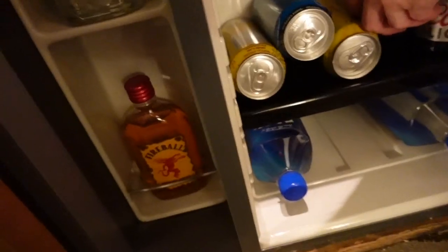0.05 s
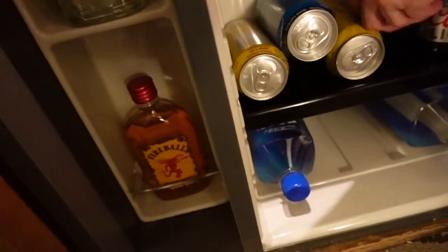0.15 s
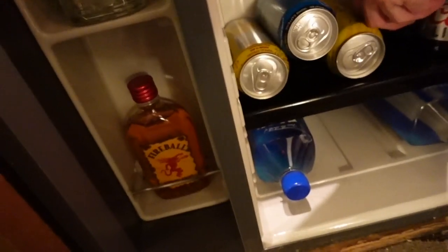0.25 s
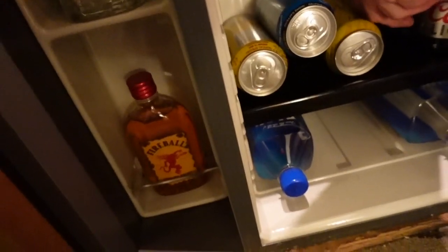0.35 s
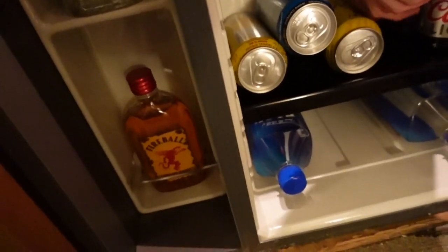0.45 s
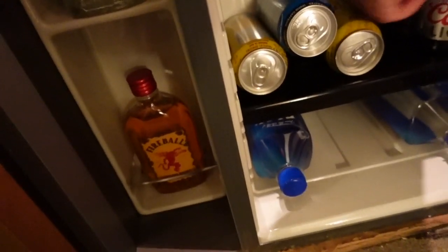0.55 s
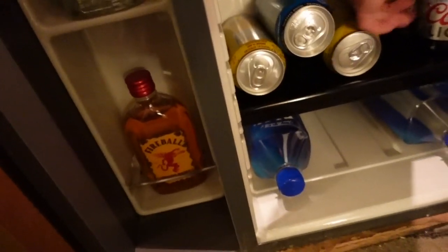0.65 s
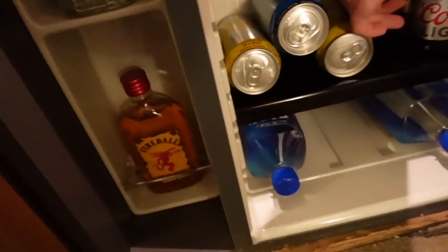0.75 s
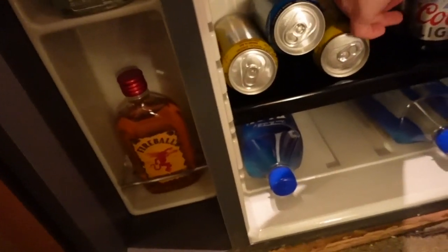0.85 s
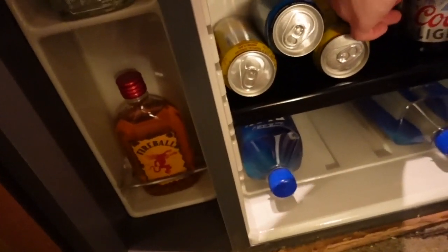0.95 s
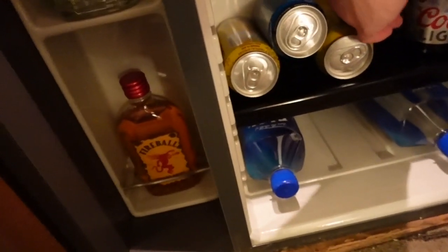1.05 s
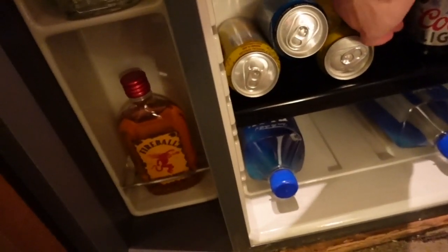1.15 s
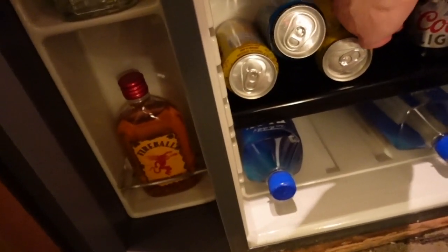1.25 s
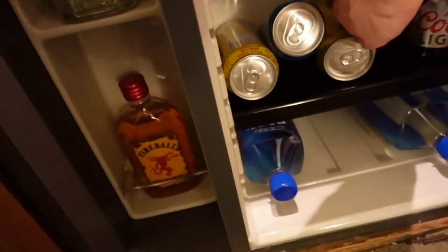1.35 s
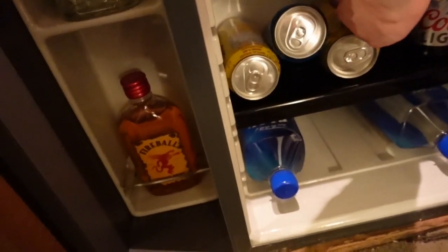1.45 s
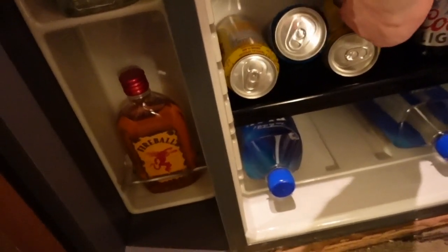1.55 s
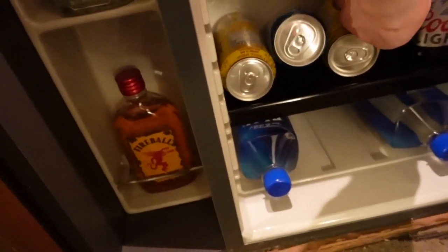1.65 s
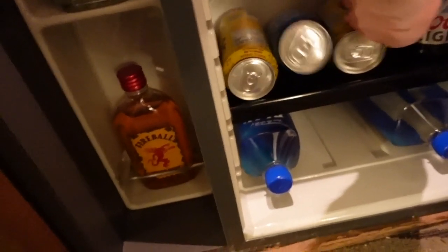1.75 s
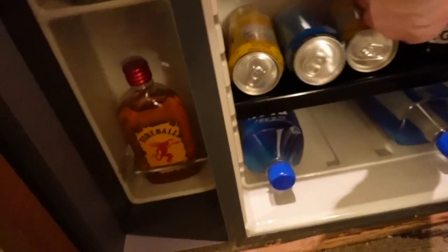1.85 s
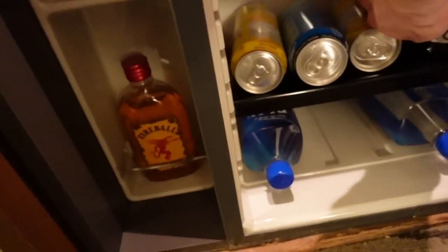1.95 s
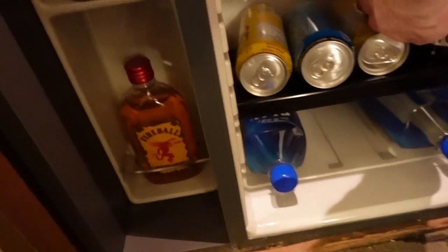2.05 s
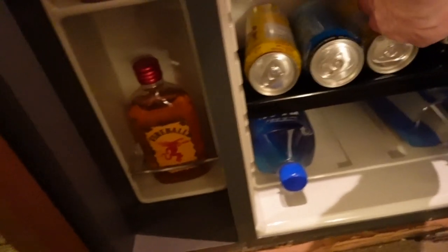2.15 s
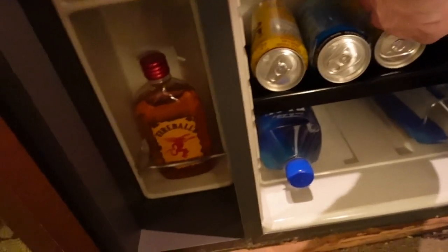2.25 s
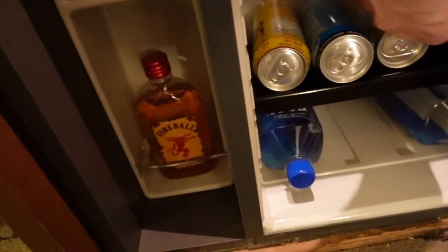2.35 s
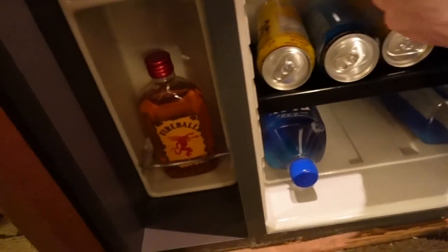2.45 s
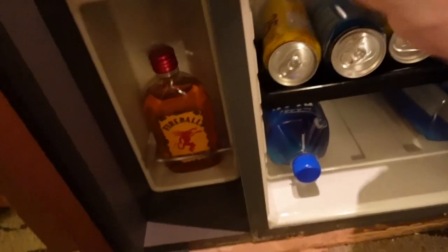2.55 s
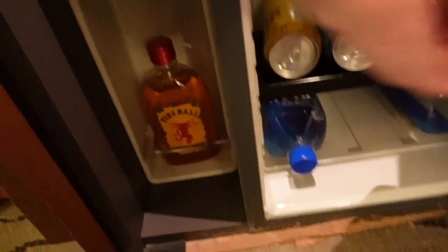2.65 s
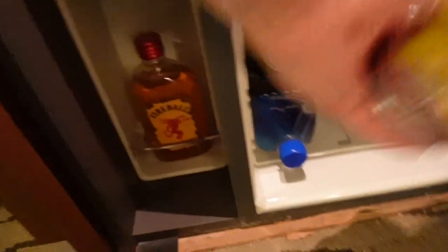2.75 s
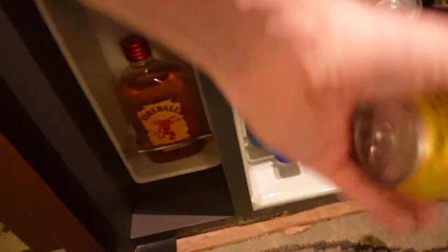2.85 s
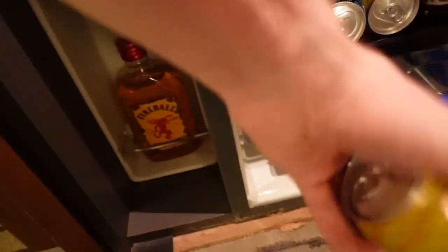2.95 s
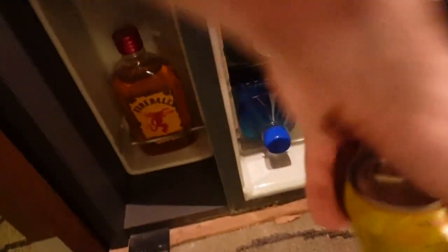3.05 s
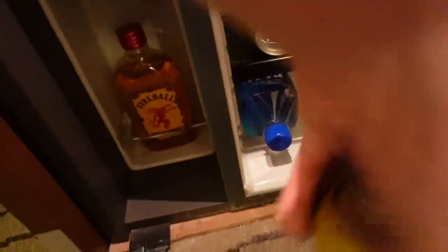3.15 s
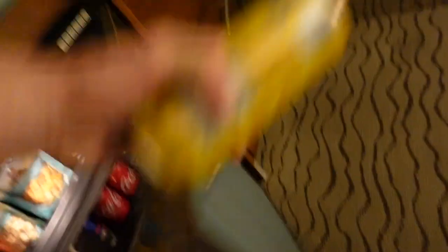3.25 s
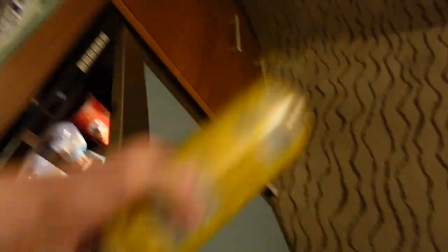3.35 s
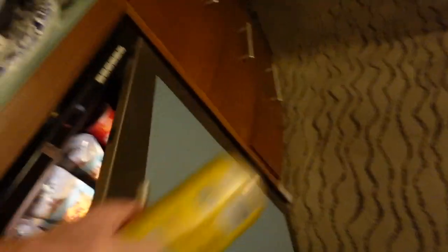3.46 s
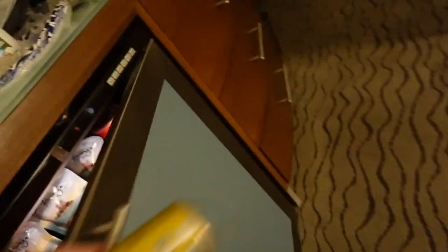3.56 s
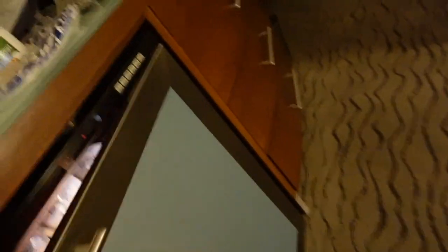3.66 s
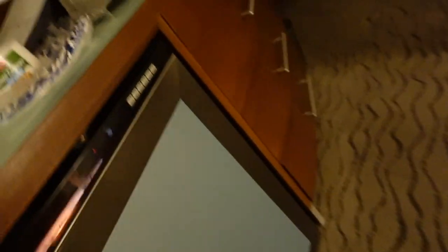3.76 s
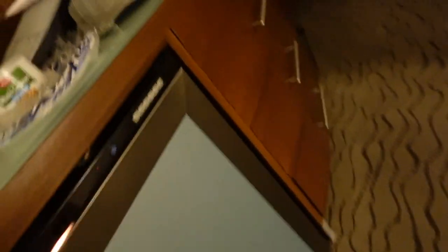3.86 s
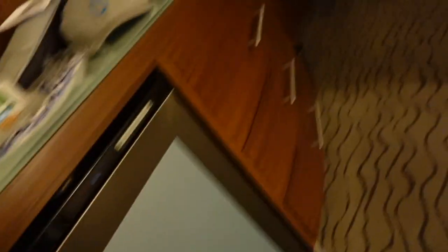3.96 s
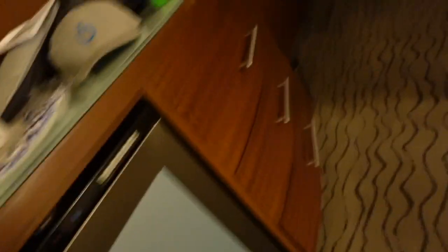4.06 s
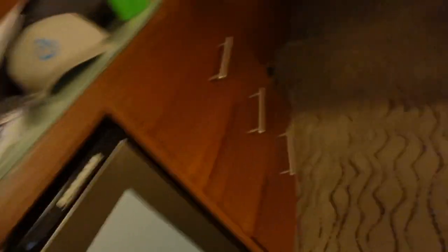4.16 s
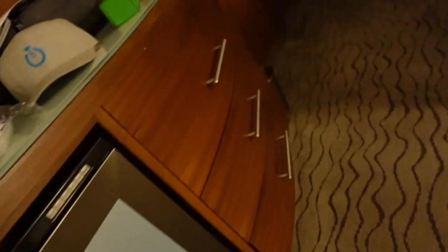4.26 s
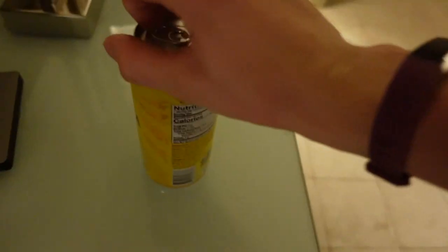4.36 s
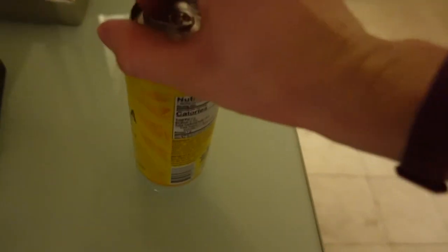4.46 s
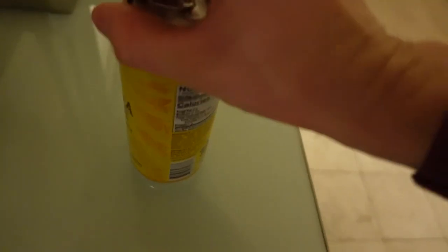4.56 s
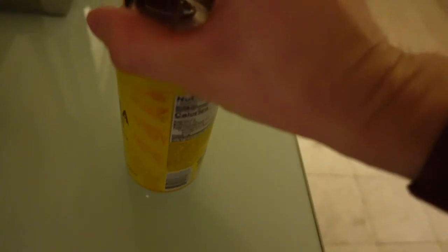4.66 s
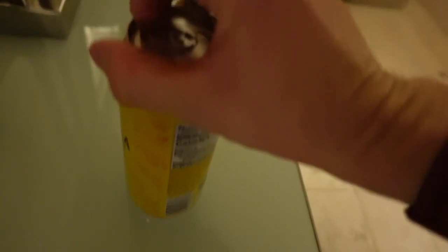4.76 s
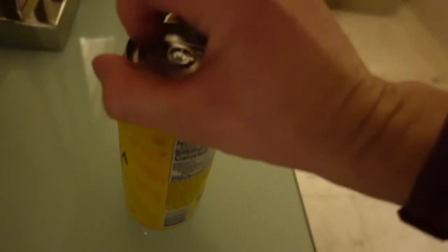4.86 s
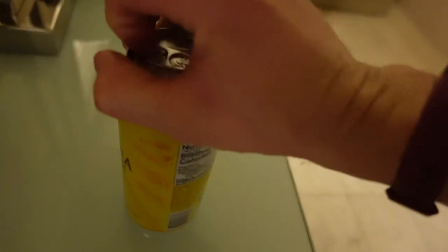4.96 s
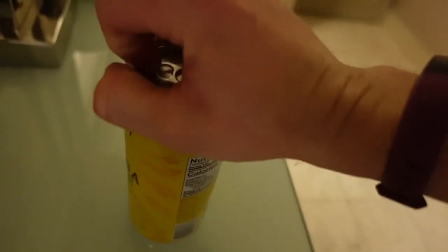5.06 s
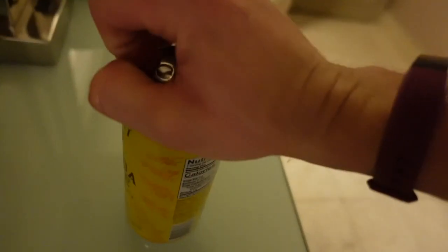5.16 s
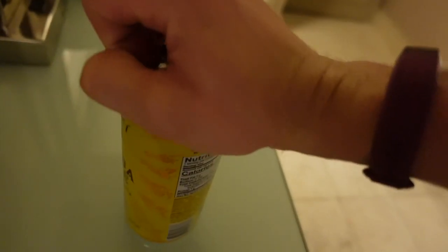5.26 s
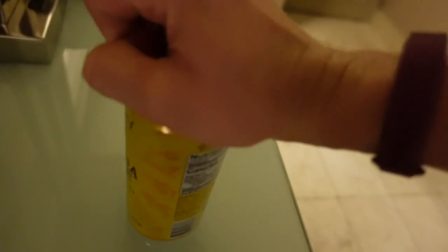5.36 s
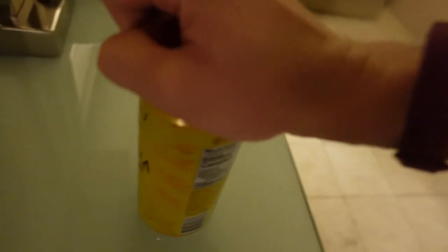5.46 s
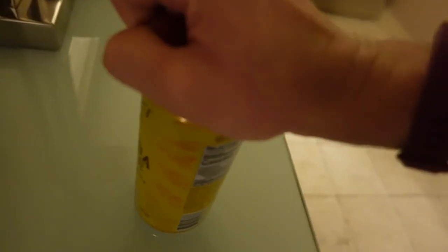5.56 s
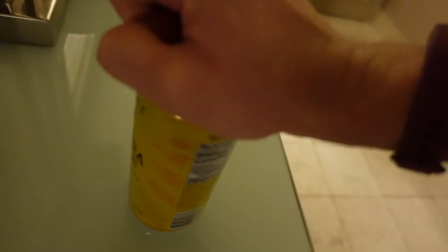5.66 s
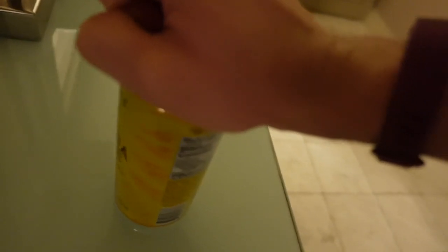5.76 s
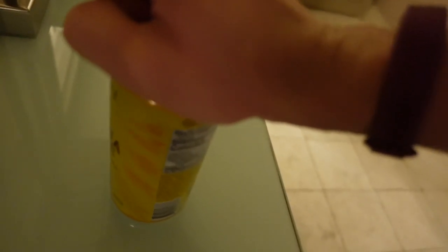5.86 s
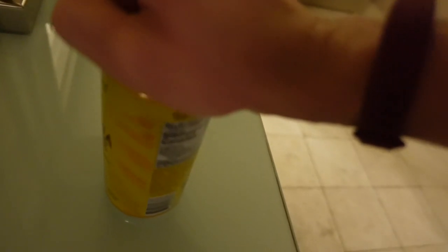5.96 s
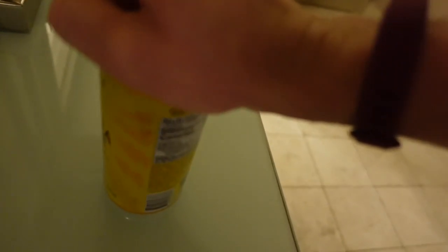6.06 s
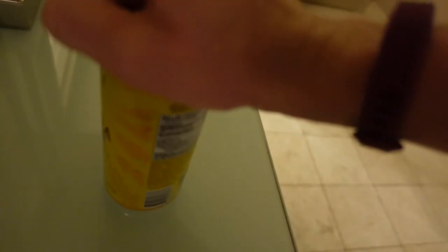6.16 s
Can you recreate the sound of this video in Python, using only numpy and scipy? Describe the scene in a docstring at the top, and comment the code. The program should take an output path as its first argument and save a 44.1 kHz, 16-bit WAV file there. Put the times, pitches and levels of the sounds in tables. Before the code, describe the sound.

Close to an open, humming fridge in a small quiet room, fingers tap and slide over drink cans, which bump dully against the wall. Cans roll, drop and clash on the rack. One is scraped out over the edge, its thin wall popping in the grip, and the door is pushed shut. After faint ticks at the tab, the lid cracks open in four quick steps, each with a hiss of gas.

```python
"""A small quiet room, a stereo microphone close to an open, humming fridge. Fingers tap and slide over
drink cans, which bump dully against the cabinet; then cans roll, drop and clash on the rack. One is
dragged out over the rack's edge and its wall pops under the grip. The fridge door is pushed shut.
Last, close up at a counter, a fingertip works under the tab and the lid cracks in four steps,
each letting out a hiss of gas."""
import sys
import numpy as np
from scipy import signal
from scipy.fft import rfft, irfft, next_fast_len
from scipy.io import wavfile

SR = 44100
rng = np.random.default_rng(int(sys.argv[2]) if len(sys.argv) > 2 else 0)


def transcribe(signal):
    """Save signal, clipped to [-1, 1], as a 16-bit WAV file at the path in sys.argv[1]."""
    frames = np.atleast_2d(signal).T
    limited = np.clip(frames, -1, 1)
    pcm = np.round(limited * 32767).astype(np.int16)
    wavfile.write(sys.argv[1], SR, pcm)


N = 273506


def amp(db):
    """Decibels to gain."""
    return 10 ** (np.asarray(db) / 20)


def add(mix, start_s, sound):
    """Mixes a sound in at start_s."""
    part = mix[:, max(round(start_s * SR), 0):][:, :sound.shape[-1]]
    part += sound[..., :part.shape[1]]


def curve(points, hz):
    """Gain at hz of a spectrum given as rows of freq_hz, gain_db."""
    f, db = np.transpose(points)
    return amp(np.interp(np.log(hz + 1), np.log(f + 1), db))


def peak(f, hz, width):
    """Gain of a resonance with steep skirts."""
    return 1 / (1 + .5 * ((f - hz) / width) ** 2) ** 2


def rings(f, table):
    """Gain of resonances given as rows of pitch_hz, width_hz, gain_db."""
    return sum(amp(db) * peak(f, hz, width) for hz, width, db in table)


def lumps(step_hz, depth_db):
    """A random uneven spectrum: each contact or gap favours its own resonances."""
    grid = np.arange(0, SR / 2, step_hz)
    heights = np.clip(rng.standard_normal(1000)[:len(grid)], -2, 2)
    return lambda f: amp(depth_db * np.interp(f / (1 + f / 12000), grid, heights))


def flutter(size, per_s, depth_db):
    """A gain that wanders at random, per_s times a second."""
    knots = rng.standard_normal(size // 8)
    return amp(depth_db * np.interp(np.arange(size) * per_s / SR, np.arange(len(knots)), knots))


def swell(t, rise, t60):
    """Builds up to 1, then dies away."""
    shape = (1 - np.exp(-t / max(rise, 1e-5))) * amp(-60 * t / t60)
    return shape / shape.max()


# stereo width at the microphone's two close capsules: freq_hz, side_to_mid_db
STEREO_WIDTH = [(100, -36), (300, -28), (700, -20), (1500, -15.5), (3000, -12.5), (5500, -9), (11000, -13)]

def noise(size, shape, grain=1, spread_db=0):
    """Stereo noise of spectrum shape(f), rms 1; grain scales the excitation, spread_db widens it."""
    length = next_fast_len(size)
    f = np.fft.rfftfreq(length, 1 / SR)
    mid, side = rfft(rng.standard_normal((2, size)) * grain, length) * shape(f)
    side = side * np.minimum(curve(STEREO_WIDTH, f) * amp(spread_db), 1)
    pair = irfft([mid + side, mid - side], length)[:, :size]
    return pair / np.sqrt(np.mean(pair ** 2) + 1e-20)


# air moving all round the microphone: freq_hz, gain_db
ROOM_AIR = [(18, -62.5), (30, -32.5), (106, -5.5), (171, -7), (204, 0.5), (238, -12), (533, -17),
            (575, -8.5), (620, -10.5), (1460, -25.5), (2140, -21), (2420, -23.5), (4550, -30.5),
            (11600, -37.5), (12500, -60), (16200, -89), (22000, -120)]
# fridge and ventilation: start_s, end_s, pitch_hz, width_hz, level_db
ROOM_HUMS = [(0, 3.32, 126, 17, -54), (0, 3.32, 813, 37, -65.5), (0, 3.32, 1630, 280, -64),
             (3.32, 4.45, 2030, 360, -65), (4.45, 6.2, 203, 16, -62.5), (4.448, 4.7, 634, 61, -73)]

def room_tone(air_db=-59, spread_db=7):
    """Moving air, and hums that switch abruptly at two cuts."""
    t = np.arange(N) / SR
    out = amp(air_db) * noise(N, lambda f: curve(ROOM_AIR, f), spread_db=spread_db)
    for start, end, hz, width, db in ROOM_HUMS:
        gate = np.clip(np.minimum(t - start, end - t) / 0.015 + 1, 0, 1)
        out += amp(db) * gate * noise(N, lambda f: peak(f, hz, width), spread_db=spread_db)
    return out


# fingers and rims, close up: start_s, peak_db, pitch_hz
FINGER_TAPS = [(.111, -31.5, 7040), (.318, -38.5, 4400), (.603, -30, 5270), (.793, -38, 6100),
               (.85, -37, 1590), (1.019, -26.5, 7600), (2.03, -18.5, 1050), (2.220, -24, 6440),
               (2.338, -33.5, 3930), (2.421, -34, 3880), (2.891, -23.5, 4630), (2.957, -20, 7400),
               (3.029, -31.5, 4230), (3.087, -25.5, 2430), (3.147, -25, 3190), (3.244, -36, 4170),
               (3.281, -41, 5000), (3.35, -37.5, 6350), (3.693, -40.5, 3900), (3.765, -45.5, 3010),
               (4.078, -38, 6100), (4.216, -35.5, 422), (5.000, -46.5, 624), (5.435, -47, 625)]
# a tap's click: freq_hz, gain_db
TAP_CLICK = [(200, -19), (1000, 1.5), (2500, 5), (5000, 5.5), (8000, 1), (12000, -10.5)]

def taps(t60=0.064, even_hz=3730, click_db_per_octave=8.5):
    """A short ring and a broad click; harder taps ring higher, and above even_hz the click leads."""
    t, out = np.arange(SR // 4) / SR, np.zeros((2, N))
    for start, db, hz in FINGER_TAPS:
        ring = noise(len(t), lambda f: peak(f, hz, 0.079 * hz)) * swell(t, 0.00055, t60)
        favoured = lumps(step_hz=150, depth_db=5)
        click = noise(len(t), lambda f: curve(TAP_CLICK, f) * favoured(f))
        click *= swell(t, 0.00013, 0.8 * t60)
        tap = ring + amp(click_db_per_octave * np.log2(hz / even_hz)) * click
        add(out, start, amp(db) * tap / abs(tap).max())
    return out


def strokes(table, arch_power=0.64):
    """Gain of a set of strokes, each speeding up and slowing down in an arch."""
    t = np.arange(N) / SR
    return sum(amp(db) * abs(np.sin(np.pi * np.clip((t - start) / length, 0, 1))) ** arch_power
               for start, length, db in table)


def until_cut(cut_s=3.325, fade_s=0.014):
    """1 until the first cut, then 0."""
    return np.clip((cut_s - np.arange(N) / SR) / fade_s, 0, 1)


# skin and metal passing over the cans: start_s, length_s, level_db
SLIDE_STROKES = [(.33, 0.15, -66), (.68, 0.15, -58.5), (.85, 0.16, -49), (1.3, 0.26, -50), (1.55, .29, -53),
                 (1.685, 0.04, -41), (1.87, 0.15, -37), (2.03, 0.22, -46), (2.5, .17, -60),
                 (2.68, 0.64, -52.5), (2.97, 0.18, -52)]
# their friction hiss: freq_hz, gain_db
SLIDE_HISS = [(530, -31), (900, -25), (1210, -6), (1340, -23.5), (1530, -3), (2550, -7.5), (2870, -5.5),
              (4830, -7.5), (5380, -7.5), (12000, -25.5), (15600, -60), (22000, -120)]
# the held can singing under the skin: pitch_hz, width_hz, gain_db
HELD_CAN_RINGS = [(1232, 120, -2), (1570, 64, 2), (1970, 110, -5), (2290, 119, -8.5), (3140, 150, 0.5),
                  (3910, 263, -4.5), (4680, 140, -6)]

def sliding(grip_db=-61.5, hiss_db=-1, ring_db=-2, skin_db=-5, lifted_s=2.7):
    """Skin and metal slip in tiny catches; fingers brush the cans until one is lifted and rings."""
    catches = flutter(N, per_s=780, depth_db=0.5) * flutter(N, per_s=39, depth_db=1.3)
    free = np.clip((np.arange(N) / SR - lifted_s) / 0.037, .3, 1)
    hiss = amp(hiss_db) * noise(N, lambda f: curve(SLIDE_HISS, f), catches)
    skin = amp(skin_db) * (1 - free) * noise(N, lambda f: peak(f, 8000, 4000), catches)
    singing = amp(ring_db) * free * noise(N, lambda f: rings(f, HELD_CAN_RINGS), catches)
    return (amp(grip_db) + strokes(SLIDE_STROKES)) * until_cut() * (hiss + skin + singing)


def blow(bands, modes, uneven_db, db, bass_db, treble_db, rise, t60_factor, build_cycles=1.4):
    """A struck body: crowded modes band by band and a few clear ones; the bass builds up last."""
    t, out = np.arange(SR) / SR, np.zeros((2, SR))
    tone = [(200, bass_db), (600, 0), (1300, 0), (3500, treble_db)]
    centres = np.log([band[0] for band in bands])
    favoured = lumps(step_hz=60, depth_db=uneven_db)
    for own, (hz, band_db, t60) in zip(np.eye(len(bands)), bands):
        crowd = noise(SR, lambda f: np.interp(np.log(f + 1), centres, own) * f / (f + 40) * favoured(f))
        envelope = swell(t, rise + build_cycles / hz, t60 * t60_factor)
        out += amp(band_db) * curve(tone, hz) * crowd * envelope
    for hz, mode_db, t60 in modes:
        detuned_hz = hz * (1 + .008 * rng.standard_normal())
        mode = np.sqrt(2) * np.sin(2 * np.pi * (detuned_hz * t + rng.random()))
        envelope = swell(t, rise + build_cycles / hz, t60 * t60_factor)
        out += amp(mode_db) * curve(tone, hz) * mode * envelope
    return amp(db) * out


# dense rattle of cans, rack and fridge walls: band_hz, gain_db, base_t60_s
FRIDGE_RATTLE = [(62, -31, 0.404), (106, -18, .35), (159, -6, 0.43), (352, -2, 0.4), (837, -3, 0.41),
                 (1643, -5, 0.44), (2670, -0.5, 0.27), (5280, -5.5, 0.2), (9500, -11, 0.085)]
# full cans against the fridge's inside wall: start_s, boom_db, pitch_hz, contact_db
WALL_BUMPS = [(.613, -33.5, 160, -47), (.685, -23.5, 163, -43.5), (.850, -22, 180, -45.5),
              (1.001, -31, 187, -53), (1.105, -33.5, 151, -60.5)]

def bumps(rock_s=.0195, rock_share=0.62):
    """A soft push booms in the cabinet for two or three cycles and rocks back a few times."""
    t, out = np.arange(SR // 4) / SR, np.zeros((2, N))
    for start, db, hz, contact_db in WALL_BUMPS:
        boom = np.sin(2 * np.pi * hz * t) * np.exp(-((t - .011) / 0.0059) ** 2)
        for k in range(6):
            add(out, start + k * rock_s, np.sqrt(2) * amp(db) * rock_share ** k * boom)
        contact = blow(FRIDGE_RATTLE, [], uneven_db=6, db=contact_db, bass_db=0, treble_db=-10,
                       rise=0.00031, t60_factor=0.95)
        add(out, start, contact)
    return out


# shoves that set cans rolling: top_speed_s, level_db, run_up_s, coast_t60_s
ROLL_SHOVES = [(1.39, -51, .17, 1.2), (1.66, -44.5, 0.19, 1.26), (2.2, -35, 0.33, 2.04),
               (2.58, -41, 0.15, 1.48), (2.92, -45.5, 0.24, 1.37), (3.265, -44.5, 0.063, .6)]
# rims running over the rack: freq_hz, gain_db
ROLL_RUMBLE = [(47, -47), (80, -18.5), (107, -16), (201, 1), (346, -2.5), (445, -7.5), (699, -5),
               (933, -9.5), (2100, -20.5), (2860, -16.5), (6000, -33.5), (7800, -64.5), (13200, -120)]
# the rack ringing under them: pitch_hz, width_hz, gain_db
RACK_RINGS = [(200, 23, 2.5), (479, 34, 2), (568, 19, 1), (817, 28.6, -7), (930, 22, -3), (1060, 45, -8),
              (1243, 20, -5.5)]

def rolling(rumble_db=-3, ring_db=-2, run_up_db=15.5):
    """Shoved cans gather speed and coast; rims rumble over the rack in jolts and keep it ringing."""
    t = np.arange(N) / SR
    shoves_db = [db - run_up_db * np.maximum(top - t, 0) / run_up - 60 * np.maximum(t - top, 0) / t60
                 for top, db, run_up, t60 in ROLL_SHOVES]
    speed = amp(np.max(shoves_db, axis=0))
    jolts = flutter(N, per_s=140, depth_db=3)
    rumble = noise(N, lambda f: curve(ROLL_RUMBLE, f), jolts)
    ringing = noise(N, lambda f: rings(f, RACK_RINGS), jolts)
    return speed * until_cut() * (amp(rumble_db) * rumble + amp(ring_db) * ringing)


# cans landing on the rack: start_s, level_db, bass_db, treble_db, t60_factor
RACK_KNOCKS = [(1.406, -25.5, -7.5, 7, 0.92), (1.426, -27.5, 1.5, -4, 0.93), (1.704, -37.5, -4, 3.5, 0.55),
               (1.816, -25, -6.5, -3.5, 0.93), (1.882, -24.5, 3, 3.5, 0.81), (1.946, -22, -2.5, 3, 0.41),
               (1.985, -31, -4, -0.5, 1.1), (2.028, -23.5, -8, -7.5, 0.56), (2.086, -24, -17.5, 2, 0.96),
               (2.130, -30, -14, -16, 1.3), (2.215, -36, -14, -6.5, 0.83), (2.337, -36, -13, -12.5, 0.76),
               (2.420, -40.5, 2, -13, .6)]
# clear modes of the loaded rack: pitch_hz, gain_db, base_t60_s
RACK_MODES = [(137.1, -9, 0.59), (217.5, -2, 0.28), (368, -10, 0.068), (423.2, -4, 0.31), (578, -5.5, 0.33),
              (864, -14.5, 0.36), (981, -13.5, 0.4), (1070, -11.5, 0.24), (1190, -11.5, 0.46),
              (1868, -15, 0.36), (2640, -13.5, 0.32), (4186, -16.5, 0.26)]

def knocks(uneven_db=5.5):
    """Cans strike the rack and shake the fridge; softer knocks press in more slowly."""
    out = np.zeros((2, N))
    for start, db, bass_db, treble_db, t60_factor in RACK_KNOCKS:
        rise = .0008 * 2 ** ((-24 - db) / 15)  # doubles for every 15 dB softer
        knock = blow(FRIDGE_RATTLE, RACK_MODES, uneven_db, db, bass_db, treble_db, rise, t60_factor)
        add(out, start, knock)
    return out


def ring_out(start_s, modes, rise_s):
    """One clear metallic ring, soon damped by the drink."""
    t, out = np.arange(SR // 2) / SR, np.zeros((2, N))
    for hz, db, t60 in modes:
        add(out, start_s, amp(db) * np.sin(2 * np.pi * hz * t) * swell(t, rise_s, t60))
    return out


# body of a fallen can: pitch_hz, level_db, t60_s
DROP_MODES = [(376.5, -21.5, .15), (579, -30.5, 0.28), (987, -29.5, 0.27), (1165, -29.5, 0.42)]

def can_drop():
    """The first can lands on its side and rings hollow."""
    return ring_out(start_s=1.424, modes=DROP_MODES, rise_s=0.0056)


# struck rims: pitch_hz, level_db, t60_s
RIM_MODES = [(2920, -13, 0.025), (2530, -28.5, 0.44), (3250, -26.5, .03), (5900, -27, 0.032)]

def rim_clash():
    """Two rims clash as the cans settle."""
    return ring_out(start_s=1.9465, modes=RIM_MODES, rise_s=0.0018)


# the can dragged out over the rack's edge: start_s, length_s, level_db
EDGE_SCRAPES = [(2.529, 0.076, -47.5), (2.701, 0.045, -48.5), (2.745, 0.078, -44), (2.984, 0.053, -48),
                (3.237, 0.079, -57)]
# its thin wall, sounded by the edge: pitch_hz, width_hz, gain_db
THIN_WALL_RINGS = [(1187, 30, 0), (1556, 35, -2), (3275, 48, -5), (3570, 65, -4), (4750, 43, -2)]

def scrapes(rasp_db=-2):
    """Quick stick and slip rasps and sets the can singing."""
    t, out = np.arange(SR // 4) / SR, np.zeros((2, N))
    for start, length, db in EDGE_SCRAPES:
        slips = flutter(len(t), per_s=730, depth_db=3)
        stroke = np.sqrt(np.maximum(np.sin(np.pi * np.minimum(t / length, 1)), 0))
        singing = noise(len(t), lambda f: rings(f, THIN_WALL_RINGS), slips)
        rasp = amp(rasp_db) * noise(len(t), lambda f: curve(SLIDE_HISS, f), slips)
        add(out, start, amp(db) * stroke * (singing + rasp))
    return out


# the flexing can, close up in the hand: pitch_hz, level_db, t60_s
POP_MODES = [(738, -20, 0.052), (812, -23.5, 0.037), (1936, -33, 0.05), (6000, -40, .05)]

def wall_pop():
    """The can's wall springs back under the grip."""
    return ring_out(start_s=2.956, modes=POP_MODES, rise_s=0.0042)


# door meeting frame: start_s, level_db, bass_db, treble_db, rise_s, t60_factor
DOOR_CONTACTS = [(3.9215, -30, -14, -8, 0.0008, 0.18), (3.933, -28, -6.5, 2.5, 0.0011, 0.27),
                 (3.941, -37.5, 3, 0, 0.0012, 1.63)]
# the door's crowded modes: band_hz, gain_db, base_t60_s
DOOR_BANDS = [(60, -20, 0.42), (123, 3, 0.29), (247, -2.5, 0.38), (550, 0, 0.35), (800, -2.5, 0.34),
              (1170, -7.5, 0.46), (1890, 1.5, 0.28), (4320, -7, 0.41), (8700, -19.5, 0.4)]

def fridge_door(uneven_db=2):
    """Pushed shut, the door strikes its frame in three quick blows."""
    out = np.zeros((2, N))
    for start, *contact in DOOR_CONTACTS:
        add(out, start, blow(DOOR_BANDS, [], uneven_db, *contact))
    return out


# a fingertip under the tab, close up at the counter: start_s, length_s, level_db
FINGERTIP_RUBS = [(4.55, 0.19, -61.5), (4.75, 0.49, -71.5), (5.19, 0.26, -64.5)]
# the nail catching the tab: start_s, peak_db
NAIL_TICKS = [(4.588, -36.5), (4.651, -37.5), (4.895, -49.5), (5.218, -48)]
# the tab's ring: pitch_hz, width_hz, gain_db
TAB_RINGS = [(2210, 95, 0), (3400, 130, -4), (4960, 80, 2), (6680, 120, -8), (5000, 3600, -12)]

def tab_rub(tick_t60=0.051):
    """A fingertip works under the tab and faintly sounds the lid; now and then the nail catches."""
    # pitch_hz, width_hz, gain_db
    lid = [(1890, 164, 4), (3550, 274, -6.5), (4730, 200, 1), (5960, 820, -5.5)]
    catches = flutter(N, per_s=340, depth_db=4)
    out = strokes(FINGERTIP_RUBS) * noise(N, lambda f: rings(f, lid), catches)
    t = np.arange(SR // 4) / SR
    for start, db in NAIL_TICKS:
        tick = noise(len(t), lambda f: rings(f, TAB_RINGS)) * swell(t, 0.00035, tick_t60)
        add(out, start, amp(db) * tick / abs(tick).max())
    return out


# the lid's ping: pitch_ratio, gain_db, t60_s
LID_MODES = [(.41, -16.5, 0.029), (.64, -12.5, 0.0088), (.86, 1, 0.013), (1.0, 6, 0.011),
             (1.09, 2.5, 0.013), (1.24, -2.5, 0.0097), (1.5, -2.5, .006), (1.751, -13, 0.0086),
             (2.1, -27, 0.0042)]
# the gas jet, also the colour of the lid's snap: freq_hz, gain_db
JET_SPECTRUM = [(60, -42), (180, -23), (400, -33), (1000, -10.5), (2000, 0.5), (3000, -1.5), (3900, 0.5),
                (5000, 7), (6300, 4), (7100, 5), (8300, -3), (9400, -3), (10500, -8.5), (12000, -15.5)]

def lid_crack(t, pitch_hz, snap_db, snap_t60=0.011):
    """The tearing lid pings over a snap of noise; peak 1."""
    ping = sum(amp(db - 60 * t / t60) * np.sin(2 * np.pi * (ratio * pitch_hz * t + rng.random()))
               for ratio, db, t60 in LID_MODES)
    snap = noise(len(t), lambda f: curve(JET_SPECTRUM, f)) * amp(snap_db - 60 * t / snap_t60)
    low_cut = signal.butter(3, 900, "high", fs=SR)  # the crack carries no bass
    crack = signal.lfilter(*low_cut, ping + snap)
    crack = np.tanh(1.5 * crack / abs(crack).max())  # the biggest swings round off
    return crack / abs(crack).max()


def gas_hiss(size, jet_db, tilt_db, head_hz, head_db, slot_hz, slot_db, gurgle_db):
    """A sputtering jet, tilted above 4 kHz, sounds the head space and the slot over a low gurgle."""
    sputter = flutter(size, per_s=530, depth_db=1)
    edge = lumps(step_hz=90, depth_db=3.8)
    tilt = lambda f: amp(tilt_db * np.log2(np.maximum(f, 4000) / 4000))
    hiss = amp(jet_db) * noise(size, lambda f: curve(JET_SPECTRUM, f) * edge(f) * tilt(f), sputter)
    head, slot = [(head_hz, 200, 0)], [(slot_hz, 400, 0)]  # pitch_hz, width_hz, gain_db
    gurgle = [(316, 190, -17), (875, 143, 5)]
    for db, cavity in (head_db, head), (slot_db, slot), (gurgle_db, gurgle):
        hiss += amp(db) * noise(size, lambda f: rings(f, cavity), sputter)
    return hiss


# the lid giving way, close up: start_s, peak_db, pitch_hz, gas_rise_s, gas_hold_s, gas_t60_s
LID_TEARS = [(5.5850, -15, 4600, 0.065, 0.13, 0.23), (5.7692, -9, 4160, 0.023, 0.028, 0.47),
             (5.8490, -8, 4620, 0.013, 0.047, 0.39), (5.988, -5, 4600, 0.0081, 0.09, 0.46)]
# gas after each tear: jet_db, tilt_db_per_octave, head_hz, head_db, slot_hz, slot_db, gurgle_db
GAS_BURSTS = [(-24.5, 9, 1800, -45.5, 4100, -27.5, -70), (-28.5, -14.5, 1750, -24.5, 4060, -23, -68),
              (-22.5, -3.5, 1870, -22, 4400, -25, -47), (-19.5, -11, 2200, -26.5, 4060, -26.5, -36.5)]

def can_opening(snap_over_jet_db=17):
    """Each tear cracks the lid and lets out a hiss, turned down just before the next crack."""
    t, out = np.arange(SR // 2) / SR, np.zeros((2, N))
    ends = [tear[0] for tear in LID_TEARS[1:]] + [N]
    for (start, db, hz, rise, hold, t60), (jet_db, *gas), end in zip(LID_TEARS, GAS_BURSTS, ends):
        add(out, start, amp(db) * lid_crack(t, hz, jet_db + snap_over_jet_db))
        flow = amp(-11 * np.maximum(1 - t / rise, 0) - 60 * np.maximum(t - hold, 0) / t60)
        turn_down = np.clip((end - start - t) / .002 - 1, .05, 1)
        add(out, start, gas_hiss(len(t), jet_db, *gas) * flow * turn_down)
    return out


def room(close, wet_db=-19, t60=0.27):
    """The furnished room puts a short, soft tail behind the direct sound."""
    t = np.arange(SR // 2) / SR
    tail = noise(len(t), lambda f: 1 / (1 + f / 5000)) * swell(t, 0.0079, t60) * (t > .003)
    tail /= np.linalg.norm(tail[0])
    return close + amp(wet_db) * signal.fftconvolve(close, tail, axes=1)[:, :N]


def scene():
    """All that reaches the microphone; the close, dry hand sounds get the room's tail."""
    fridge = knocks() + fridge_door() + can_drop() + rim_clash()
    fridge += rolling() + sliding() + scrapes() + bumps()
    close = taps() + wall_pop() + tab_rub() + can_opening()
    return fridge + room(close) + room_tone()


# balance of the microphone's capsules: freq_hz, left_minus_right_db
MIC_BALANCE = [(100, 0), (250, -.5), (550, -1.8), (1100, -1.2), (2200, -1.6), (4500, -1.2), (9000, -.3)]

def record(dry, cutoff_hz=11800):
    """The stereo microphone: a little louder on the right in the middle range, top treble cut off."""
    lean = np.sqrt(curve(MIC_BALANCE, np.fft.rfftfreq(2 * N, 1 / SR)))
    capsules = irfft(rfft(dry, 2 * N) * np.array([lean, 1 / lean]))[:, :N]
    low_pass = signal.firwin(241, cutoff_hz, window=("kaiser", 8), fs=SR)
    return signal.oaconvolve(capsules, low_pass[None], "same")


dry = scene()
out = record(dry)
transcribe(out)
```